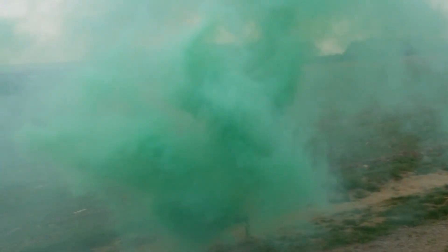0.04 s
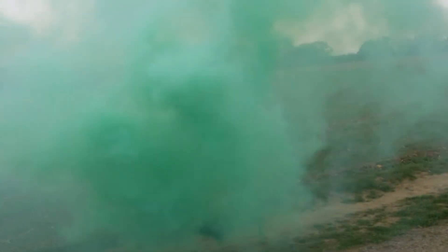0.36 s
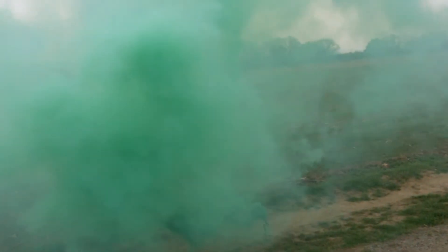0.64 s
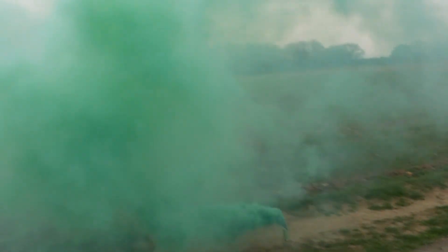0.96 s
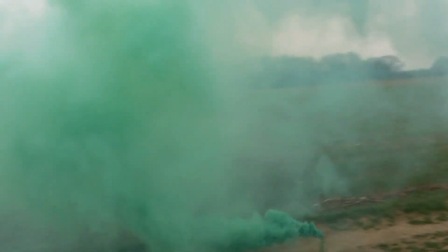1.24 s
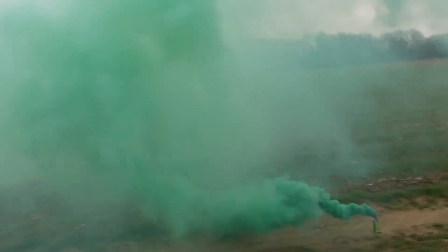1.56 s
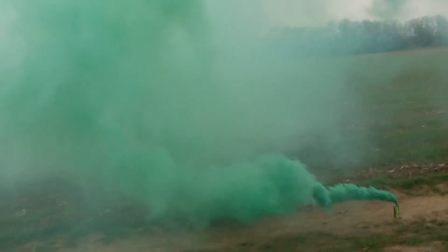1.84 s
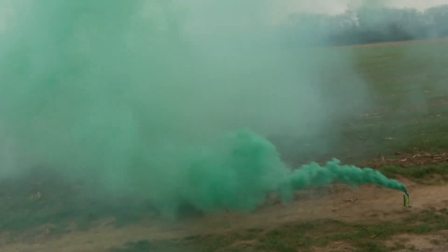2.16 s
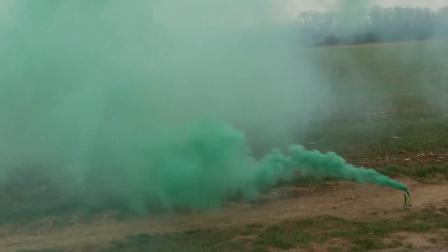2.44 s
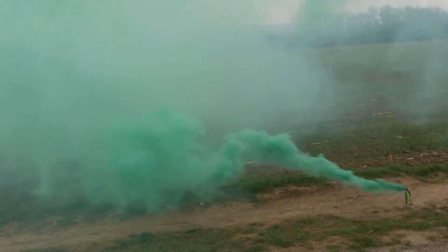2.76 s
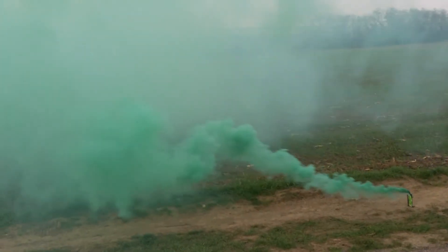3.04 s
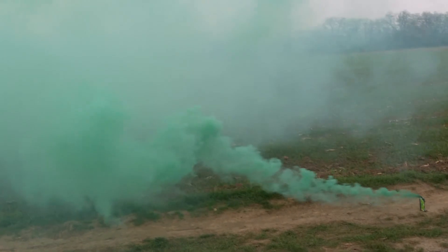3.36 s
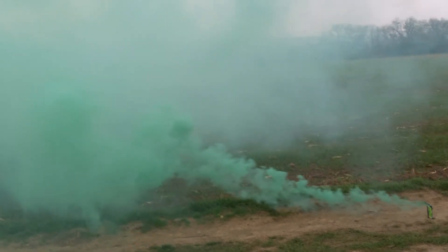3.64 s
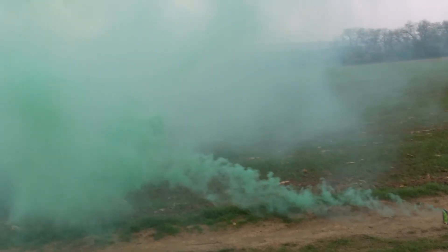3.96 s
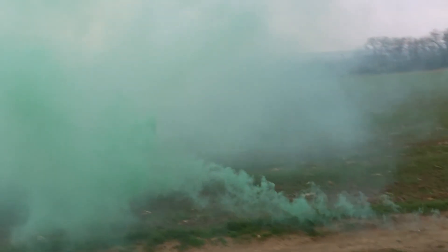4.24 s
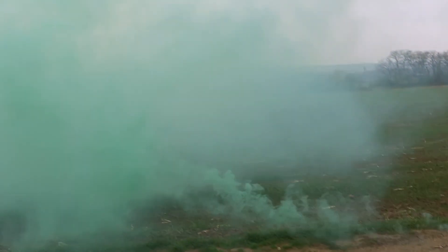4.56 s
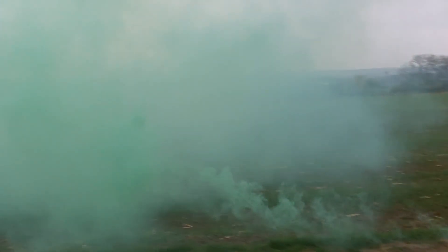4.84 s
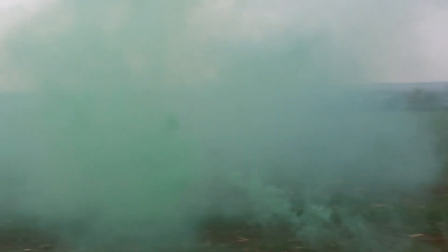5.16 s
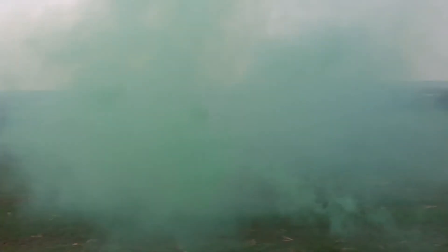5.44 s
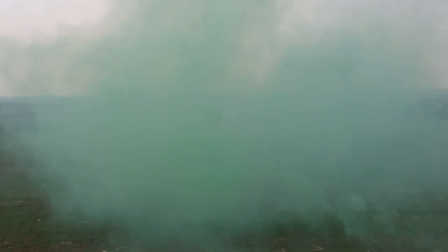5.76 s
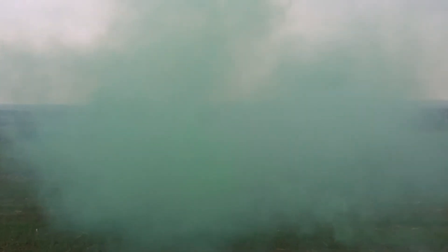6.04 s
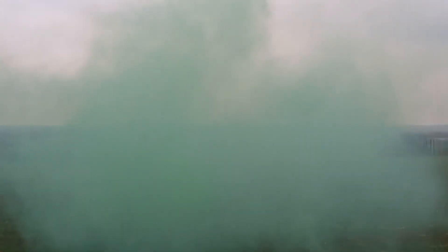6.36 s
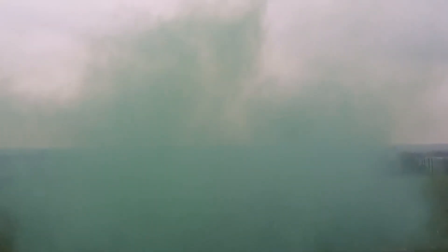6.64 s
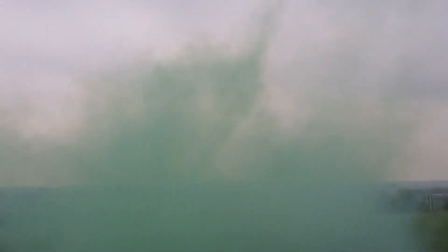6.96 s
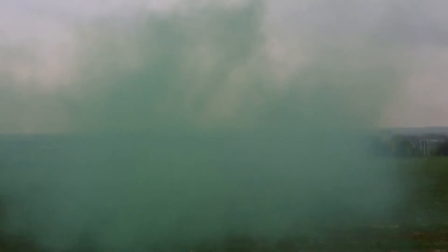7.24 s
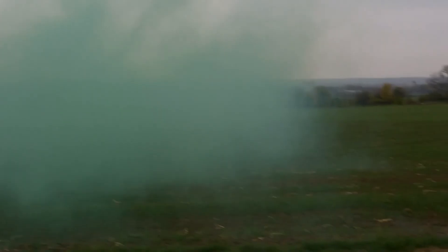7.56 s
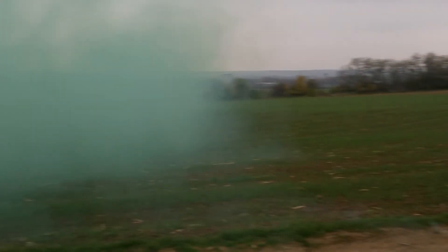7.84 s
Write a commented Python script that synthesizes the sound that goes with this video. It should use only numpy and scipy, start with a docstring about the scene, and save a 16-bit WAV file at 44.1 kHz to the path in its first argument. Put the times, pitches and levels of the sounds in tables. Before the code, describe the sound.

Low, uneven wind buffets a hand-held microphone while a smoke canister's soft hiss dies away in the first two seconds. A few sharp little clicks and a faint rustle of dry stalks come through as the gusts peak and stop. The rest is very quiet open field: a faint far-off rumble comes up, with scattered ticks, light scuffs of shoes on soil and a thin airy hiss.

```python
"""A smoke canister vents in an open field: a soft nozzle hiss and plume rush, fading within two seconds.
Gusts and eddies flutter on the two microphone ports of a hand-held camera, then drop.
Dry grass rustles underfoot as stalks rub, with small clicks and a few light shoe scuffs on soil.
A faint high hiss swells briefly three times, then lingers in the background from about 1.5 to 3 s.
A faint distant rumble rises after the wind, over an airy rustle, still air and microphone hiss."""
import sys
import numpy as np
from scipy import signal
from scipy.fft import rfft, irfft, next_fast_len
from scipy.io import wavfile
from scipy.ndimage import map_coordinates

SR = 44100
rng = np.random.default_rng(int(sys.argv[2]) if len(sys.argv) > 2 else 0)


def file_out(sig):
    """Save sig as 16-bit WAV at sys.argv[1]."""
    # one column per channel
    cols = np.atleast_2d(sig).T
    # limit, then scale
    lim = np.clip(cols, -1, 1)
    pcm = np.round(lim * 32767).astype(np.int16)
    wavfile.write(sys.argv[1], SR, pcm)


N = 348390
TIME_S = np.arange(N) / SR

# nozzle resonances (centre [Hz], width [Hz], gain [dB])
NOZZLE_MODES = [(1350, 380, -8.5), (1680, 200, -10), (1980, 310, -3), (2760, 400, -3.5), (3300, 360, 0),
                (3620, 590, 2), (4210, 810, -2), (5300, 790, -10)]
# plume rush (frequency [Hz], relative density [dB])
PLUME_SPECTRUM = [(150, -29), (300, -13), (430, 0), (530, -1), (680, -7), (850, -5.5), (1050, -9),
                  (1250, -18), (2500, -24.5), (5000, -39)]
# gusts at the ports (time [s], length [s], left level [dB], right level [dB])
WIND_GUSTS = [(0.076, 0.36, -46.5, -31), (0.39, 0.38, -58, -44.5), (0.727, 0.14, -40, -39),
              (1.096, 0.18, -47, -45.5), (1.623, 0.3, -46, -45.5), (1.998, 0.2, -33, -38.5),
              (2.306, 0.26, -34, -36.5), (2.531, .11, -35, -34), (2.766, 0.286, -49, -48.5),
              (3.62, 0.051, -63, -82)]
# strongest eddies (time [s], level [dB], pitch [Hz], port hit [left/right])
WIND_EDDIES = [(0.032, -24, 95, "right"), (0.128, -22.5, 138.7, "right"), (.18, -20, 115.8, "right"),
               (.483, -31.5, 111, "right"), (0.626, -27.5, 172, "left"), (0.702, -28.5, 142, "right"),
               (.762, -28, 122.5, "right"), (0.969, -38.5, 120, "left"), (1.256, -29.5, 111, "left"),
               (1.32, -36.5, 115.8, "left"), (1.431, -33.5, 113.5, "left"), (1.526, -29, 116.3, "left"),
               (2.295, -23.5, 114.4, "right"), (2.464, -23.5, 115.5, "right"),
               (2.504, -21.5, 199.4, "left"), (2.518, -18, 214.3, "left"), (2.568, -21.5, 151.2, "left"),
               (2.591, -24.5, 269.6, "left"), (2.605, -27.5, 149.3, "left"), (2.778, -34.5, 118.4, "right"),
               (2.831, -32.5, 113, "right"), (3.058, -38, 90, "left"), (3.187, -41, 84, "left")]
# pressure swings of the breeze (frequency [Hz], relative density [dB])
BREEZE_SPECTRUM = [(15, -12.5), (30, -17.5), (50, -2.5), (80, -0.5), (115, -3), (170, -10), (240, -19),
                   (350, -29), (600, -48.5), (1200, -82)]
# strokes through grass (time [s], level [dB], length [s])
GRASS_STROKES = [(1.38, -65, 0.14), (1.6, -61, 0.26), (1.95, -68.5, 0.42), (2.35, -60, 0.24),
                 (2.7, -70.5, 0.35), (3.07, -69.5, 0.072), (4.95, -78, 0.46), (6.7, -74.5, 0.17),
                 (7.6, -74.5, 0.67)]
# rubbing stalks (frequency [Hz], relative density [dB])
STALK_SPECTRUM = [(250, -19), (600, 2.5), (1000, 1), (1600, 1), (2450, -2.5), (3200, -11.5), (4000, -14),
                  (4700, -13.5), (5400, -18), (6500, -31), (15000, -28)]
# clicks and soft taps (time [s], level [dB], pitch [Hz], brightness [dB])
CLICK_EVENTS = [(.8596, -22.5, 1143, -41), (1.8122, -30.5, 1750, -1.5), (2.2122, -36.5, 1420, -12),
                (2.4502, -43.5, 1907, -8), (2.616, -41.5, 2800, -10), (2.7032, -40.5, 1453, -35),
                (2.7485, -41, 886, -10.5), (2.7775, -45.5, 1400, -23.5), (2.7935, -44, 1713, -24),
                (3.03, -50.5, 848, -20), (3.4692, -49, 1970, -25), (3.9332, -49.5, 1300, -14),
                (3.9712, -50, 1290, -18), (4.685, -47, 626, -19.5), (4.827, -52, 2120, -26),
                (5.4358, -56.5, 1010, 3), (6.1, -44, 335, -23), (6.4175, -50, 765, -2.5),
                (6.506, -49, 1400, -23), (7.337, -51, 4800, -19)]
# scuffs on soil (time [s], level [dB], length [s], pitch [Hz], grit re rub [dB], left re right [dB])
SOIL_SCUFFS = [(1.402, -55, 0.042, 520, -28, -6), (2.214, -56.5, 0.011, 1400, -2, -1),
               (4.6216, -49, 0.005, 480, -3, -1.5), (4.637, -60, 0.018, 420, 0, 0.5),
               (4.705, -64, 0.07, 480, -8, -1), (4.82, -69, .018, 865, 6, -1),
               (6.107, -57.5, 0.017, 288, -20, 1), (7.223, -57.5, 0.032, 199, -31, 0),
               (7.389, -57.5, 0.048, 220, -24, 1), (7.795, -57.5, 0.047, 387, -17.5, -21.5),
               (7.873, -55.5, .008, 397, -22, -16)]
# soil grit (frequency [Hz], relative density [dB])
GRIT_SPECTRUM = [(300, -6), (900, -4), (1300, -4), (1800, 3.5), (2300, 3.5), (2800, 0), (3200, -21),
                 (4200, -11.5), (5200, -8), (6500, -30), (14000, -19)]
# swells of faint high hiss (time [s], level [dB], length [s])
HIGH_HISS_SWELLS = [(.26, -73, 0.34), (.76, -77.5, 0.078), (1.38, -81, 0.075), (2.3, -81, 1.255)]
# distant rumble (frequency [Hz], relative density [dB])
RUMBLE_SPECTRUM = [(20, -18), (45, 0.5), (70, 3), (110, -1.5), (160, -7), (300, -9.5), (480, -13),
                   (750, -23.5), (1300, -38), (3000, -55), (8000, -70)]
# still air plus self-noise, per microphone (frequency [Hz], relative density [dB])
FLOOR_LEFT = [(30.0, 1), (70.0, 4.5), (200.0, -9), (600.0, -10), (1100.0, -13.5), (2000.0, -14.5),
              (3500.0, -22.5), (4500.0, -20), (5300.0, -12.5), (6200.0, -31), (8500.0, -27), (11400.0, -21),
              (13000.0, -26), (15500.0, -25.5)]
FLOOR_RIGHT = [(30.0, -5), (70.0, -9), (200.0, -9), (600.0, -12), (1100.0, -14.5), (2000.0, -18.5),
               (3500.0, -22), (4500.0, -24.5), (5300.0, -30), (6200.0, -30), (8500.0, -29),
               (11400.0, -27.5), (13000.0, -26.5), (15500.0, -27.5)]
# port imbalance for near sounds (frequency [Hz], left re right [dB])
PORT_BALANCE = [(200, -1), (700, 2.5), (1300, 7), (2100, 5.5), (2850, 1.5), (3600, 7), (4100, 9),
                (4500, 12), (5400, 22), (6500, -3.5), (11000, 15), (15000, 4)]


def canister(hiss_db=-55.5, rush_db=-54):
    """Gas hisses through the nozzle's resonances; the plume rushes below and fades more slowly."""
    hiss_gain = amp(hiss_db - 8.5 * TIME_S - 3.5 * TIME_S ** 2)
    rush_gain = amp(rush_db - 6.5 * TIME_S)

    def nozzle(hz):
        power = sum(np.abs(amp(db) * resonance(hz, centre_hz, width_hz) ** 2) ** 2
                    for centre_hz, width_hz, db in NOZZLE_MODES)
        roll_off = (0.12 + 1 / (1 + (hz / 4650) ** 60)) / (1 + (hz / 5900) ** 12)
        return np.sqrt(power * roll_off)

    hiss = hiss_gain * unit(filtered(white(shared=0.43), nozzle))
    rush = rush_gain * coloured(white(shared=0.84), PLUME_SPECTRUM)
    return hiss + rush


def wind(breeze_hz=104.52, calm_db=-79.5, flutter_db=3.5, eddy_cycles=2.1, evenness=0.34):
    """Gusts reach both ports, each with its own eddies; a faster eddy buffets at a higher pitch."""
    ports = []
    gust_s, length_s, left_db, right_db = np.transpose(WIND_GUSTS)
    for port, gust_db in (("left", left_db), ("right", right_db)):
        flow = amp(calm_db) + swells(zip(gust_s, gust_db, length_s))
        power = (flow * amp(flutter_db * wobble(30))) ** 2
        weighted_speed = power.copy()
        for at_s, db, pitch_hz, hit in WIND_EDDIES:
            if hit == port:
                eddy_power = (amp(db) * swell(at_s, eddy_cycles / pitch_hz)) ** 2
                power += eddy_power
                weighted_speed += eddy_power * pitch_hz / breeze_hz
        pressure = coloured(rng.standard_normal(N), BREEZE_SPECTRUM)
        analytic = signal.hilbert(pressure, next_fast_len(N))[:N]
        # partly flattened envelope: swing size follows the flow
        swirl = unit(analytic.real / (np.abs(analytic) ** 2 + 0.69) ** (evenness / 2))
        # turbulence passes at the power-weighted mean speed
        position = np.cumsum(weighted_speed / power)
        ports.append(np.sqrt(power) * map_coordinates(swirl, [position], mode="mirror"))
    return np.array(ports)


def grass(grain_db=2.5, stir_db=-86):
    """Stalks rub in a dense run of tiny cracks that swells with each stroke."""
    grains = unit(white(shared=0.47) * amp(grain_db * wobble(500)))
    unevenness = amp(.8 * wobble(30))
    return (amp(stir_db) + swells(GRASS_STROKES)) * unevenness * coloured(grains, STALK_SPECTRUM)


def clicks(decay_cycles=0.47, echo_db=-14.0, echo_s=0.001976):
    """Each click: a cycle or two of its pitch plus a bright crack, then a weak close reflection."""
    out = np.zeros((2, N + SR))
    age_s = np.arange(SR // 40) / SR
    crack_band = signal.butter(2, [700, 4600], "bandpass", fs=SR)
    for at_s, db, pitch_hz, bright_db in CLICK_EVENTS + stalk_ticks():
        decay = age_s * pitch_hz / decay_cycles
        body = -(decay * np.exp(1 - decay)) ** 2 * np.sin(2 * np.pi * pitch_hz * age_s)
        crack = amp(bright_db - 4.5) * np.exp(-age_s / .0011)
        ground_scatter = amp(bright_db / 2 - 18) * np.exp(-age_s / .0044)
        fizz = rng.standard_normal(len(age_s)) + 0.54 * rng.standard_normal((2, len(age_s)))
        click = amp(db) * (body + signal.lfilter(*crack_band, (crack + ground_scatter) * fizz))
        for delay_s, gain in ((0, 1), (echo_s, amp(echo_db))):
            start = round((at_s + delay_s) * SR)
            out[:, start:start + len(age_s)] += gain * click
    return out[:, :N]


def stalk_ticks(count=10, from_s=1.5, until_s=7.5, spread_db=6, spread_octaves=0.55, bright_db=-22):
    """Faint random ticks of stalks, as rows like CLICK_EVENTS."""
    return [(from_s + when * (until_s - from_s),
             -58 + spread_db * (2 * size - 1),
             1400 * 2 ** (spread_octaves * (2 * pitch - 1)),
             bright_db) for when, size, pitch in rng.random((count, 3))]


def scuffs():
    """A shoe presses the soil: a short dull rub with grit on top."""
    n_fft = next_fast_len(N)
    soil = rfft(white(shared=0.76), n_fft)
    hz = np.fft.rfftfreq(n_fft, 1 / SR)
    grit = coloured(white(shared=0.32) * amp(2.2 * wobble(600)), GRIT_SPECTRUM)
    out = np.zeros((2, N))
    for at_s, db, length_s, pitch_hz, grit_db, left_db in SOIL_SCUFFS:
        rub = unit(irfft(soil * resonance(hz, pitch_hz, 1.2 * pitch_hz) ** 2)[:, :N])
        out += amp(db) * pan(left_db) * swell(at_s, length_s) * (rub + amp(grit_db) * grit)
    return out


def high_hiss():
    """Faint high hiss: three brief swells, then a long background one from about 1.5 to 3 s."""
    hiss_hz_db = [(3000, -17), (6500, 0.5), (8500, -2), (12000, -5.0), (15500, -1.5)]
    return pan(left_db=11) * swells(HIGH_HISS_SWELLS) * coloured(white(shared=0.046), hiss_hz_db)


def distant_rumble(quiet_db=-77.5, added_db=-63, midpoint_s=4.24, rise_s=.16):
    """A wavering low rumble comes up, then holds."""
    risen = (1 + np.tanh((TIME_S - midpoint_s) / rise_s)) / 2
    gain = (amp(quiet_db) + amp(added_db) * risen) * amp(1.1 * wobble(8))
    return pan(left_db=1.6) * gain * coloured(white(shared=0.84), RUMBLE_SPECTRUM)


def airy_rustle(steady_db=-82.5, grows_from_s=6.9, growth_db_per_s=6):
    """A faint high rustle: steady, then growing near the end."""
    gain = amp(steady_db + growth_db_per_s * np.maximum(TIME_S - grows_from_s, 0))
    rustle_hz_db = [(1500, -15), (3500, -1), (4500, -2), (6000, -8.5), (15000, -17)]
    return pan(left_db=9.4) * gain * coloured(white(shared=.1), rustle_hz_db)


def noise_floor(level_db=-65.5):
    """Still air and microphone self-noise, independent on each side."""
    floor = filtered(white(shared=0), lambda hz: amp([along(FLOOR_LEFT, hz), along(FLOOR_RIGHT, hz)]))
    return amp(level_db) * unit(floor)


def amp(db):
    """Decibels to gain."""
    return 10 ** (np.asarray(db) / 20)


def unit(x):
    """Scale to rms 1."""
    return x / np.sqrt(np.mean(x ** 2) + 1e-30)


def pan(left_db):
    """Left and right gains for a level difference."""
    return amp(np.outer([.5, -.5], left_db))


def along(points, hz):
    """Interpolate (frequency [Hz], value) points on a log axis."""
    knots_hz, values = np.transpose(points)
    return np.interp(np.log(hz + 1), np.log(knots_hz + 1), values)


def wobble(knots_per_s):
    """Smooth random curve."""
    return map_coordinates(rng.standard_normal(int(N * knots_per_s / SR) + 4), [TIME_S * knots_per_s])


def swell(at_s, length_s):
    """Bell of height 1; power is 1/e at half the length from its centre."""
    return np.exp(-2 * np.minimum(((TIME_S - at_s) / length_s) ** 2, 20))


def swells(rows):
    """Gain of (time [s], level [dB], length [s]) bells, summed in power."""
    return np.sqrt(sum((amp(db) * swell(at_s, length_s)) ** 2 for at_s, db, length_s in rows))


def white(shared):
    """Stereo white noise; the shared fraction of its power is common to both sides."""
    return np.sqrt(shared) * rng.standard_normal(N) + np.sqrt(1 - shared) * rng.standard_normal((2, N))


def filtered(x, response):
    """Apply a frequency response."""
    n_fft = next_fast_len(N + SR // 4)
    return irfft(rfft(x, n_fft) * response(np.fft.rfftfreq(n_fft, 1 / SR)), n_fft)[..., :N]


def coloured(x, spectrum):
    """Shape by (frequency [Hz], level [dB]) points, at rms 1."""
    return unit(filtered(x, lambda hz: amp(along(spectrum, hz))))


def resonance(hz, centre_hz, width_hz):
    """Response of one damped resonance."""
    return 1j * hz * width_hz / (centre_hz ** 2 - hz ** 2 + 1j * hz * width_hz)


def scene():
    """Near sounds and the high hiss mostly favour the left port; the rest adds directly."""
    flicker = amp(.45 * wobble(14))
    sources = flicker * (canister() + high_hiss()) + grass() + clicks() + scuffs()
    at_ports = filtered(sources, lambda hz: pan(along(PORT_BALANCE, hz)))
    return at_ports + wind() + distant_rumble() + airy_rustle() + noise_floor()


def record(dry):
    """The camera's band limit."""
    cutoff_hz = 15750
    return filtered(dry, lambda hz: hz < cutoff_hz)


dry = scene()
out = record(dry)
file_out(out)
```